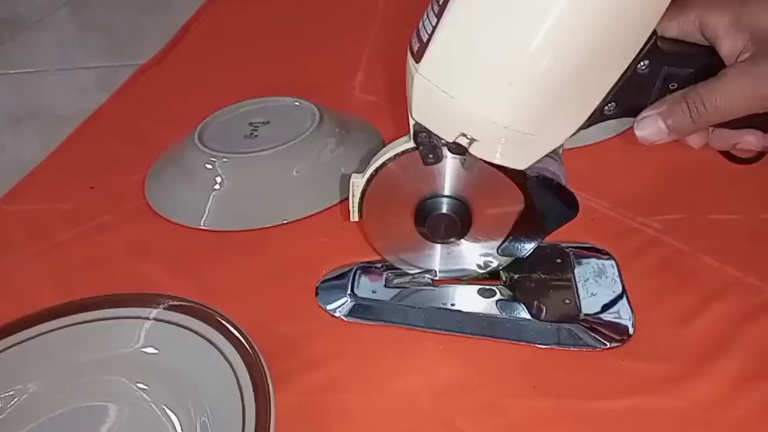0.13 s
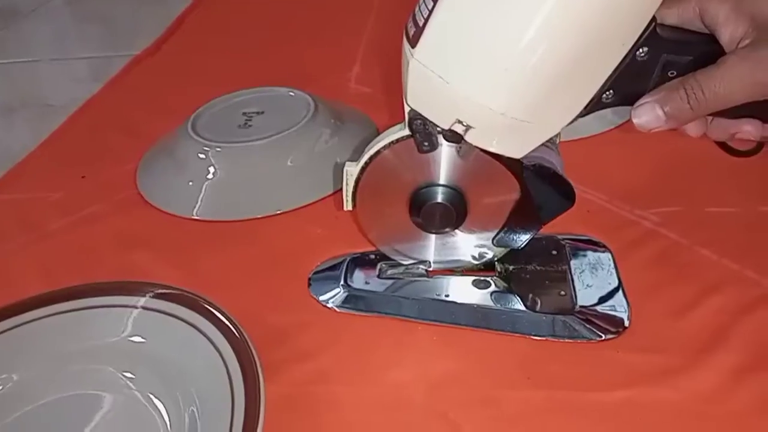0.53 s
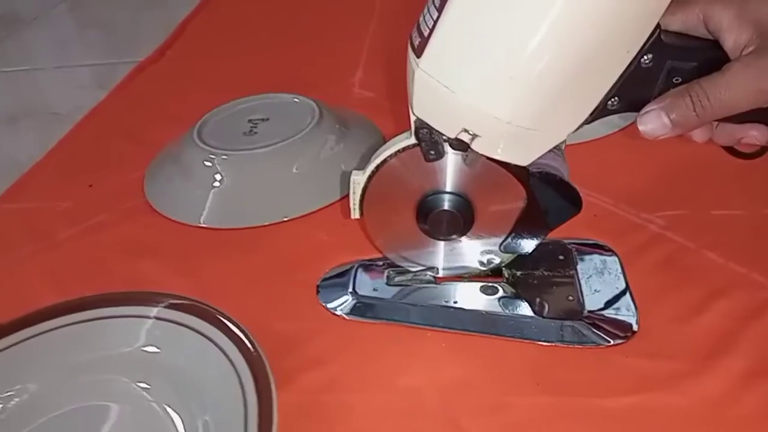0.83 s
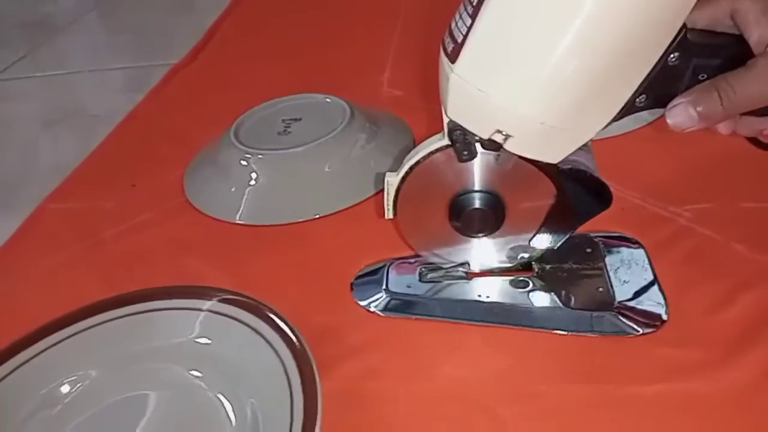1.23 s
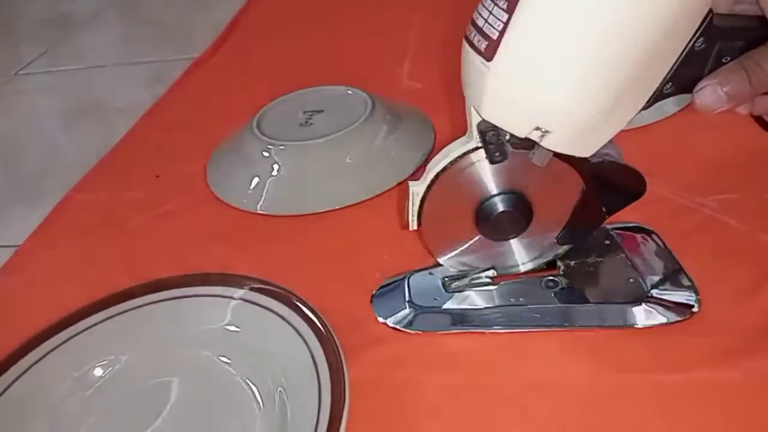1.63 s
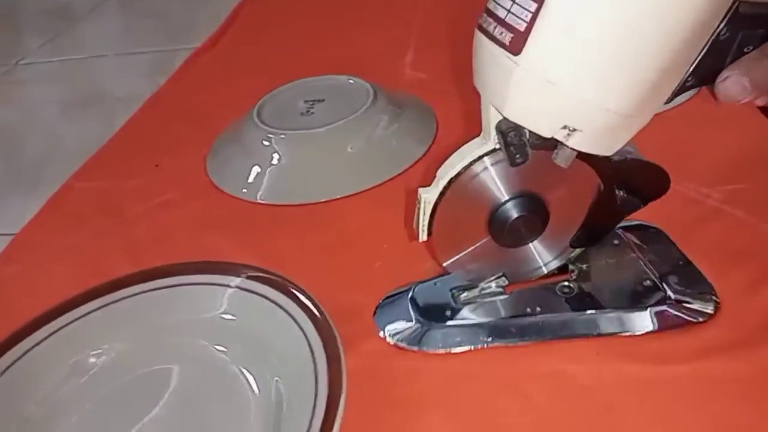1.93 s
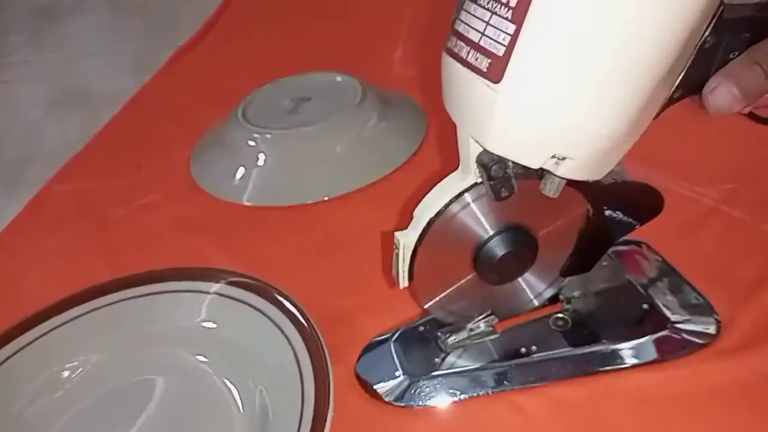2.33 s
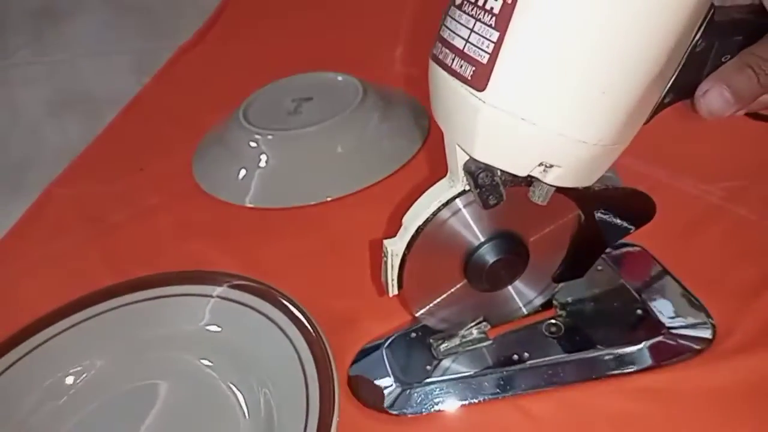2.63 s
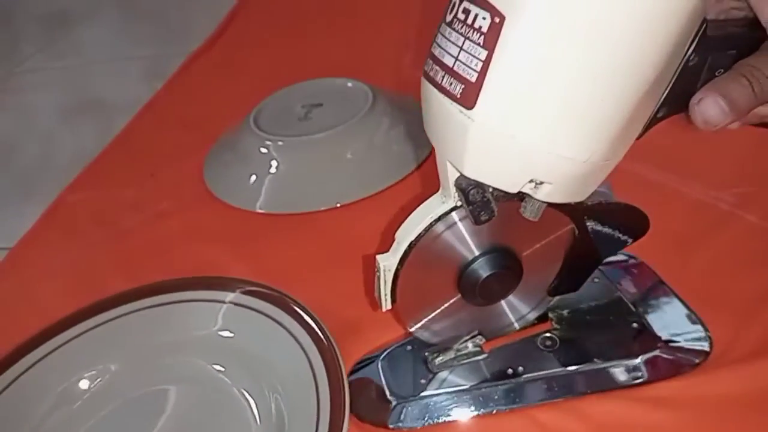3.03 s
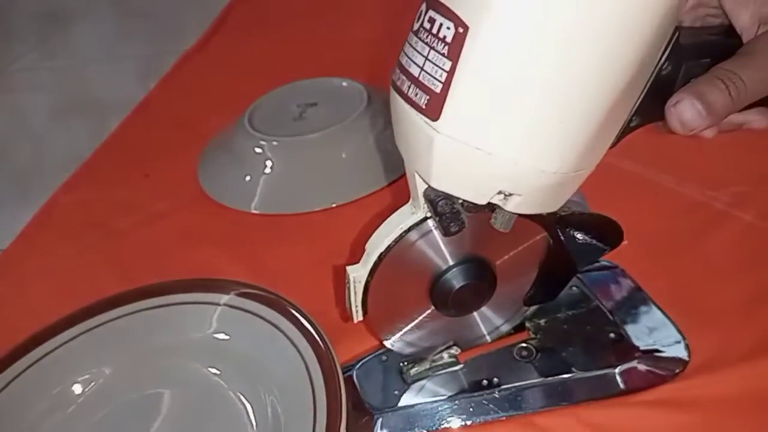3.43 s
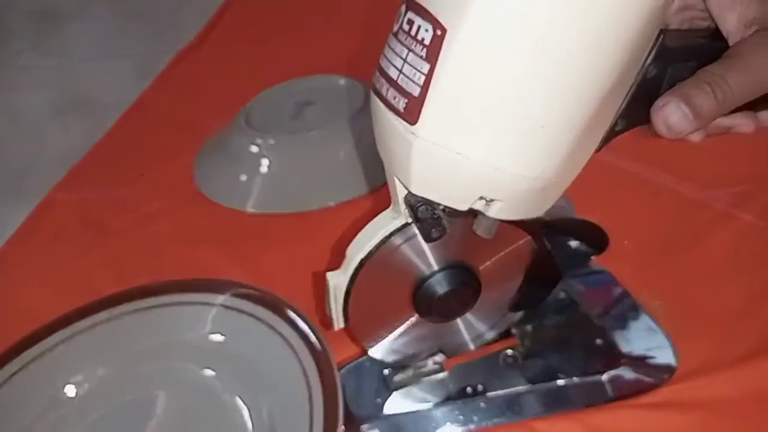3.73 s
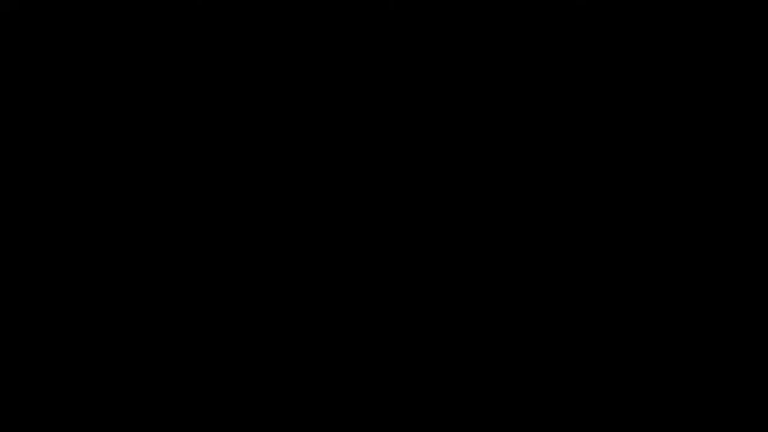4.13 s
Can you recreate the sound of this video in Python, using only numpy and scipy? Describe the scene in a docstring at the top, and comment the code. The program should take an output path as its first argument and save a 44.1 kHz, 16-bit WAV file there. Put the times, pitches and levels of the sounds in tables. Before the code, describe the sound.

Silence for about 0.1 s, then a fast fade-in, full by 0.3 s, to a handheld electric fabric cutter very close by. Its brush motor is already speeding up: rough, gritty broadband buzz with a hollow housing colour and bright hiss around 5-6 kHz. From 0.5 to about 1 s noise suppression thins the roar band by band, some low parts until 1.8 s, leaving it patchy and slightly watery. Through it a gear whine climbs from roughly 1.1 kHz at 0.3 s to 1.5 kHz at 1 s, nearing 1.7 kHz after 2.5 s. It is strongest from about 1.4 s, wavering, with side tones and brief lower and higher hums flaring. Tiny dry metallic blade ticks occur irregularly, clustering around 0.6 s and 2.2-2.8 s. Around 4.1 s the motor is switched off; brushy noise drops and the pitch begins to sag, cut off near 4.3 s before stopping. Dry, mono.

```python
"""A hand-held round-blade fabric cutter, close by on a cloth-covered table: its brush motor runs up towards
full speed and is switched off. Shaft orders sing as tones over brush, gear and fan noise, which is coloured
by the housing's resonances; now and then the blade ticks, a short metallic ring with a crack.
The sound fades in, and from half a second on a noise suppressor sets in and turns the noise down, band by band."""
import sys
import numpy as np
from scipy import signal
from scipy.io import wavfile
from scipy.ndimage import uniform_filter1d, minimum_filter1d, map_coordinates

SR = 44100
rng = np.random.default_rng(int(sys.argv[2]) if len(sys.argv) > 2 else 0)


def transcribe(signal):
    """Save signal, clipped to [-1, 1], as a 16-bit WAV file at the path in sys.argv[1]."""
    frames = np.atleast_2d(signal).T
    limited = np.clip(frames, -1, 1)
    pcm = np.round(limited * 32767).astype(np.int16)
    wavfile.write(sys.argv[1], SR, pcm)


def to_linear_factor(level_db):
    """Convert decibel levels (scalar or array-like) to linear amplitude factors."""
    exponent = np.asarray(level_db, float) / 20
    return 10 ** exponent


N = 189144
OFF_S = 4.12  # the motor is switched off


def curves(rows, t=None):
    """One value per sample (or per time t) for each column after the time."""
    times_s, *columns = np.transpose(rows)
    if t is None:
        t = np.arange(N) / SR
    return [np.interp(t, times_s, column) for column in columns]


def along(hz, points):
    """Values of (Hz, value) points, read off along a log frequency axis."""
    point_hz, values = np.transpose(points)
    return np.interp(np.log(hz + 1), np.log(point_hz + 1), values)


def unit(x):
    """Scaled to rms 1."""
    return x / np.sqrt(np.mean(x ** 2) + 1e-20)


def wobble(rate):
    """A smooth random curve, rate knots a second."""
    knots = rng.standard_normal(int(N * rate / SR) + 4)
    return map_coordinates(knots, [np.arange(N) * rate / SR])


def fall(t, at_s, width_s):
    """Falls smoothly from 1 to 0 around at_s."""
    return .5 - .5 * np.tanh((t - at_s) / (2 * width_s))


# the quick and the slow stage of the run-up: missing_per_s [turns/s lacking at 0 s], time_constant_s [s]
RUN_UP_STAGES = [(51.1, .276), (55.7, .672)]


def speed(t):
    """Armature turns a second, and the top speed it closes in on in two stages; it coasts down after the switch."""
    top_per_s, coast_s = 252.2, 1.85
    powered_s = np.minimum(t, OFF_S)
    missing = sum(lack * np.exp(-powered_s / tau) for lack, tau in RUN_UP_STAGES)
    return (top_per_s - missing) * np.exp(-np.maximum(t - OFF_S, 0) / coast_s), top_per_s


def turns():
    """Angle of the armature in radians, the running sum of its speed."""
    return 2 * np.pi * np.cumsum(speed(np.arange(N) / SR)[0]) / SR


def rubbing():
    """What shakes the housing: gritty noise pulsing with shaft and mains, and faint orders, clearest early."""
    angle, t = turns(), np.arange(N) / SR
    mains_hz = 50
    pulse = 1 + 0.12 * np.cos(angle) + 0.056 * np.cos(2 * angle + 1)
    pulse = pulse + 0.056 * np.cos(4 * np.pi * mains_hz * t)  # twice per mains cycle
    grit_db = 0.87 * wobble(180) + 0.86 * wobble(14)
    noise = unit(pulse * to_linear_factor(grit_db) * rng.standard_normal(N))
    faint = sum(to_linear_factor(5 * wobble(4)) * np.cos(k * angle + 3 * wobble(5)) for k in range(4, 54))
    faint_db = np.interp(t, [.6, 1.6], [-9, -13])
    return noise + to_linear_factor(faint_db) * unit(faint)


def patches(hz, shape):
    """Random gain in dB over frequency and time, the patchiness of the noise suppressor."""
    def smooth(bins, frames):
        rough = uniform_filter1d(rng.standard_normal(shape), bins, 0)
        return unit(uniform_filter1d(rough, frames, 1))

    strand_db = along(hz, [(3000, 2.8), (6000, 1.6)])[:, None]
    flicker_db = along(hz, [(9000, 0.19), (12500, 0.0)])[:, None]
    narrow_strands = strand_db * smooth(bins=2, frames=5)
    wide_blotches = .9 * smooth(bins=9, frames=4)
    broad_flicker = flicker_db * smooth(bins=50, frames=2)
    return narrow_strands + wide_blotches + broad_flicker


# where the noise suppressor sets in: pitch_hz [Hz], extra_db [dB, noise level added until then],
# onset_s [s, middle of the change]
SUPPRESSOR_ONSET = [(70, 3, 0.52), (130, 4, .9), (196, 10, 1.76), (333, 5, 0.98), (464, 13.5, 1.01),
                    (540, 11, 0.67), (720, 11, 0.82), (890, 6.5, 0.57), (1350, 9.5, 0.755),
                    (1930, 3.5, 0.714), (2320, 6.5, 0.59), (2680, 5, 0.86), (3250, 3.5, 0.66),
                    (3900, 4, 0.7), (4850, 8, 0.76), (5370, -1.5, 0.69), (7150, 6, 0.674), (8200, 6, 0.52),
                    (9100, -0.5, 0.54), (11200, 1.5, 0.65)]


def suppressor_onset(hz, t):
    """Extra dB of the untreated noise, and how untreated it is: 1 to 0, each frequency at its own time."""
    extra_db = along(hz, [(f, db) for f, db, s in SUPPRESSOR_ONSET])[:, None]
    onset_s = along(hz, [(f, s) for f, db, s in SUPPRESSOR_ONSET])[:, None]
    return extra_db, fall(t, onset_s, .015)


# slow swells of the noise: start_s [s], all_db [dB, whole noise], hiss_db [dB, weighted by HISS_SHARE]
NOISE_SWELLS = [(.3, 2, -3.5), (.6, 2, -3), (.8, 0, 3), (1.05, 0, 0.5), (1.3, .5, 2.5), (1.6, 0, 3.5),
                (2.05, 0.5, 1), (2.3, 0.5, -1.5), (2.8, 2, -1.5), (3.05, 0.5, -1.5), (3.3, 1.5, 0.5),
                (3.55, 0.5, 2.5), (3.9, -0.5, 4), (4.12, 0.5, 3.5), (4.29, 1.5, 3)]
# how far each pitch follows the hiss swell: pitch_hz [Hz], share [factor on hiss_db]
HISS_SHARE = [(2500, 0.13), (4000, 0.7), (5000, 0.79), (5250, 1.4), (6000, 0.7), (9000, 0.042)]
# the housing's resonances, low half and high half: pitch_hz [Hz], level_db [relative dB per Hz]
BODY_RESONANCES = [(35, -21.5), (80, -34), (170, -18), (245, -4.5), (320, -12.5), (480, -3.5), (720, -5.5),
                   (950, -11), (1240, -2.5), (1430, -9.5), (1620, -1), (1900, 1.5), (2150, -9),
                   (2600, -9.5), (3000, -16)]
SHELL_RESONANCES = [(3600, -12.5), (3800, -7.5), (4400, -8), (5050, -6.5), (5180, 0), (5400, 0.5),
                    (5950, 4.5), (6350, -1), (6650, -7), (8250, -21.5), (9300, -12.5), (10900, -4),
                    (11800, -8.5), (13900, -27), (15400, -8), (15560, -57)]
# regions of the noise, base drone to fan air: pitch_hz [Hz], top_db [dB],
# slow_db [dB lost per turn/s below top speed], off_db [dB lost at the switch];
# both losses count only once the noise suppressor works
NOISE_REGIONS = [(600, -0.5, 0, -0.5), (1280, 2, 0, 4.5), (1960, 2, 0.28, 5), (4200, 2, 0, 8.5),
                 (5640, -0.5, 0.44, 0.5), (11100, 1, 0.34, 1)]


def motor_noise():
    """Brushes, gears and fan: rubbing filtered by the housing's resonances, then thinned by a noise suppressor."""
    early_evenness = .4  # share of the patchiness missing before the noise suppressor sets in
    # extra depth of the gaps between resonances once the noise suppressor works, until the switch-off
    hollow_share = 0.32
    hz, t, spectrum = signal.stft(rubbing(), SR, nperseg=1024)
    patch_db = patches(hz, spectrum.shape)
    extra_db, untreated = suppressor_onset(hz, t)
    pulls = fall(t, OFF_S + 0.019, 0.0077)

    colour_db = along(hz, BODY_RESONANCES + SHELL_RESONANCES)[:, None]
    valley_db = colour_db + minimum_filter1d(-colour_db, size=30, axis=0)  # depth below the nearby peak
    hollow_db = hollow_share * valley_db * (1 - untreated) * pulls

    regions = np.array(NOISE_REGIONS)
    top_db, slow_db, off_db = (along(hz, regions[:, [0, k]])[:, None] for k in (1, 2, 3))
    turns_per_s, top_per_s = speed(t)
    running_db = -slow_db * (top_per_s - turns_per_s) - off_db * (1 - pulls)
    all_db, hiss_db = curves(NOISE_SWELLS, t)
    swell_db = top_db + all_db + np.outer(along(hz, HISS_SHARE), hiss_db)
    swell_db = swell_db + untreated * extra_db + (1 - untreated) * running_db

    gain = to_linear_factor(colour_db + hollow_db + swell_db + (1 - early_evenness * untreated) * patch_db)
    gain = gain / np.sqrt(np.mean(to_linear_factor(2 * colour_db)))
    return to_linear_factor(-37.5) * signal.istft(spectrum * gain, SR, nperseg=1024)[1][:N]


def tone(gain, order, angle):
    """One shaft order: a cosine locked to the armature, slightly unsteady in level and phase."""
    return gain * to_linear_factor(1.5 * wobble(25)) * np.cos(order * angle + .4 * wobble(30))


# gear mesh and its side tones: start_s [s], mesh_db, upper_db, lower_db [dB rms before wavering]
GEAR_MESH = [(.3, -55, -70, -72), (.45, -47, -70, -72), (.62, -41.5, -70, -75), (.7, -52, -70, -72),
             (.9, -50, -70, -69), (1.15, -56, -70, -70), (1.33, -44.5, -62, -69), (1.38, -38, -53, -64),
             (1.7, -34, -56, -59), (2.2, -36, -57, -51), (2.3, -45, -53, -63), (2.5, -41, -52, -63),
             (2.8, -40.5, -49, -53), (2.93, -44, -48, -54), (3.42, -38, -53, -66), (3.7, -47, -54, -61),
             (3.8, -41.5, -46, -53), (4.08, -37.5, -53, -51), (4.2, -47, -68, -75), (4.29, -58, -70, -75)]


def gear_mesh(angle):
    """The mesh tone at the 7th order, which a slower gear splits into side tones."""
    mesh_db, upper_db, lower_db = curves(GEAR_MESH)
    out = tone(to_linear_factor(mesh_db), 7, angle)
    beat = .41 * angle  # the slower gear
    for offset, side_db in [(1, upper_db), (1.5, upper_db - 3), (-1, lower_db)]:
        side_gain = to_linear_factor(side_db + 4 * wobble(14))
        out = out + side_gain * np.cos(7 * angle + offset * beat + 1.5 * wobble(25))
    return out


# the other shaft orders, most of them louder in the run-up: order [cycles per turn],
# run_up_db [dB rms before wavering], change_s [s], steady_db [dB rms before wavering]
SHAFT_ORDERS = [(1, -54, 1.43, -60), (2, -47, 0.96, -69), (3, -59.5, 1.2, -63), (5, -60, 0.91, -65),
                (8, -52, 1.1, -73), (9, -49.5, 0.76, -64.5), (11, -62, 1.7, -71), (13, -58, 0.51, -70.5),
                (14, -80, 2.1, -66), (16, -74, 1.2, -71), (19, -64, 1.8, -77), (20, -63, 1.0, -64),
                (24, -58, 0.49, -60), (25, -57, 2.1, -59), (28, -52, 0.8, -68), (29, -47, .62, -63.5),
                (33, -72, 2.8, -79), (39, -73, 1.8, -75), (48, -61, 2.0, -73)]
# single orders flare up: peak_s [s], order [cycles per turn], peak_db [dB rms before wavering],
# length_s [s, between the points at 1/e of the peak]
ORDER_FLARES = [(.7, 25, -44.5, 0.43), (0.894, 20, -48, 0.051), (0.994, 5, -45, 0.057),
                (1.116, 1, -48, 0.65), (1.12, 25, -59, 0.33), (1.403, 25, -44, 0.26), (1.197, 24, -45, 1),
                (1.36, 11, -66, .2), (1.412, 3, -47, 0.047), (1.55, 19, -52, .15), (1.4, 16, -56, .12),
                (1.59, 3, -51, 0.33), (1.713, 13, -53.5, 0.29), (2.02, 16, -51, 0.16), (2.28, 5, -50, .1),
                (2.45, 8, -41, 0.16), (2.485, 5, -46, 0.054), (2.64, 5, -45.5, 0.078), (2.75, 14, -59, .3),
                (2.8, 8, -46, .15), (2.995, 5, -51, 0.11), (3.065, 8, -44.5, 0.36), (3.303, 8, -48, 0.13),
                (3.35, 5, -49, 0.073), (3.45, 14, -56, 0.32), (3.794, 14, -53, 0.2), (3.9, 24, -48, .2),
                (3.922, 16, -52, 0.64), (4.066, 5, -51.5, 0.057), (4.243, 5, -46.5, 0.12),
                (4.272, 8, -49, .1), (4.27, 1, -46.5, 0.17)]


def shaft_orders(angle):
    """Multiples of the shaft rate, each gliding from run-up to steady level, with bell-shaped flares on top."""
    t = np.arange(N) / SR
    gains = {}
    for order, run_up_db, change_s, steady_db in SHAFT_ORDERS:
        glide_db = steady_db + (run_up_db - steady_db) * fall(t, change_s, 0.079)
        gains[order] = to_linear_factor(glide_db + 3 * wobble(7.075))
    for peak_s, order, peak_db, length_s in ORDER_FLARES:
        flare = to_linear_factor(peak_db) * np.exp(-(2 * (t - peak_s) / length_s) ** 2)
        gains[order] = np.hypot(gains[order], flare)
    return sum(tone(gain, order, angle) for order, gain in gains.items())


def whine():
    """Gear mesh and shaft orders, sung from one slightly unsteady armature angle."""
    angle = turns() + .007 * wobble(30)
    return np.sqrt(2) * (gear_mesh(angle) + shaft_orders(angle))  # sqrt(2): a tone's rms to its peak


# the clearest blade ticks: start_s [s], level_db [dB, before the ring's own levels and the band filter]
BLADE_TICKS = [(0.3735, -24), (0.589, -24), (0.6116, -19.5), (0.665, -24), (0.9664, -24), (1.169, -26),
               (1.514, -24), (2.1875, -20.5), (2.261, -24), (2.3227, -21), (2.4582, -23.5), (2.59, -20.5),
               (2.6455, -21.5), (2.654, -15.5), (2.7916, -23), (3.0529, -19.5), (3.21, -21), (3.545, -28),
               (3.7987, -24)]
# what the blade rings with: pitch_hz [Hz], level_db [relative dB, varied at random per tick]
BLADE_RING = [(4500, -13), (5400, -8.5), (5750, -11.5), (6050, -4), (6450, -7)]


def ticks():
    """The blade touches its guide: a short ring and a crack, both kept by the shell to its bright middle band."""
    faint_per_s, faint_db = 2, -28  # extra ticks at random times, up to 4 dB fainter than faint_db
    rise_s, decay_s = .0004, .012  # decay_s: time to fall by 60 dB
    out, t = np.zeros(N + SR), np.arange(SR // 50) / SR
    draws = rng.random((round(faint_per_s * OFF_S), 2))
    faint_ticks = [(OFF_S * when, faint_db - 4 * size) for when, size in draws]
    for start_s, level_db in BLADE_TICKS + faint_ticks:
        ring = sum(to_linear_factor(ring_db + rng.normal(0, 4)) * np.sin(2 * np.pi * (hz * t + rng.random()))
                   for hz, ring_db in BLADE_RING)
        crack = .8 * rng.standard_normal(len(t))
        envelope = to_linear_factor(level_db - 60 * t / decay_s) * (1 - np.exp(-t / rise_s))
        out[round(start_s * SR):][:len(t)] += envelope * (ring + crack)
    shell = signal.butter(4, [4000, 6600], "bandpass", fs=SR, output="sos")
    return signal.sosfilt(shell, out[:N])


def scene():
    """The cutter: motor noise, whine and blade ticks in one channel."""
    return (motor_noise() + whine() + ticks())[None]


# fade-in: start_s [s], level_db [dB]
FADE_IN = [(.115, -90), (.15, -43), (.22, -22), (.29, -1), (.33, 0)]


def fade_in(dry):
    """Silence up to the first point of the fade, then a quick rise to full level."""
    sounding = np.arange(N) > FADE_IN[0][0] * SR
    return dry * to_linear_factor(curves(FADE_IN)[0]) * sounding


def low_pass(x):
    """Removes everything above the highest recorded frequency."""
    return signal.sosfilt(signal.butter(12, 15710, fs=SR, output="sos"), x)


def record(dry):
    """The finished mix, faded in."""
    return low_pass(fade_in(dry))


dry = scene()
out = record(dry)
transcribe(out)
```